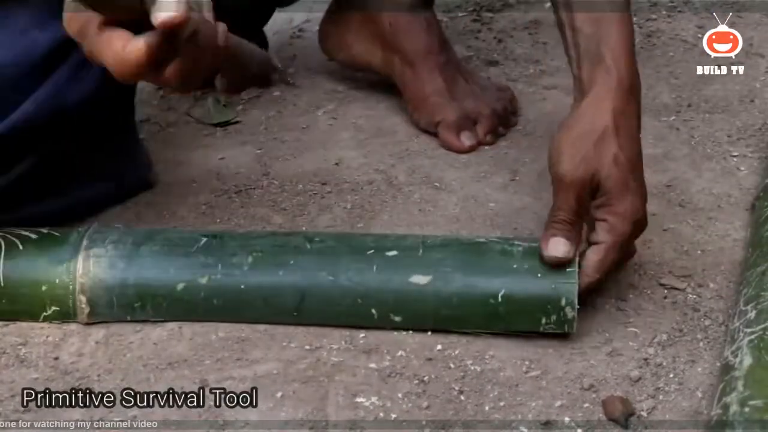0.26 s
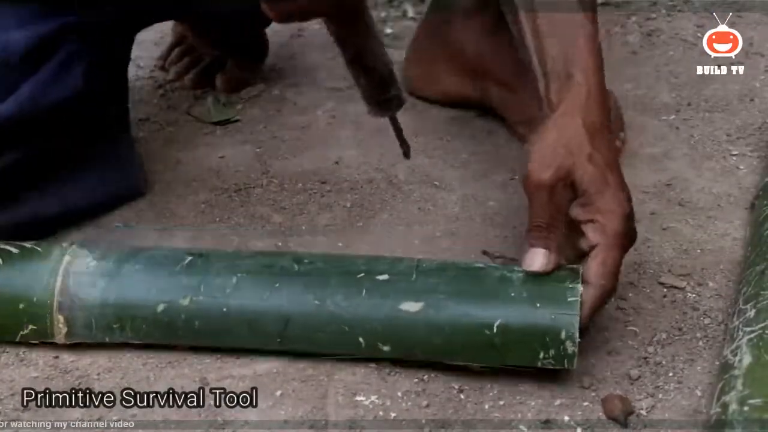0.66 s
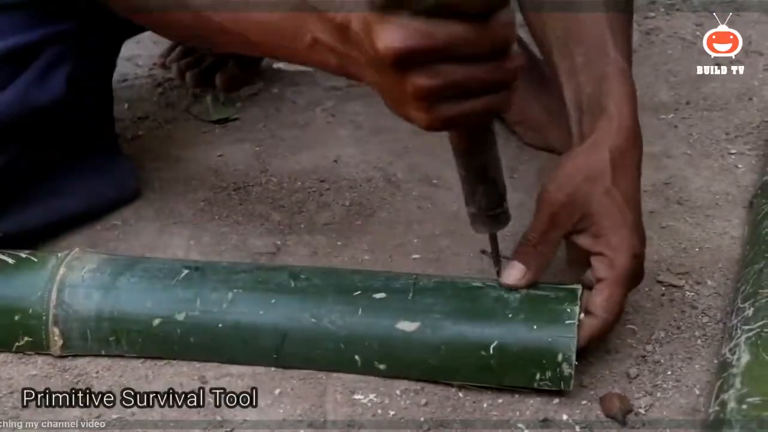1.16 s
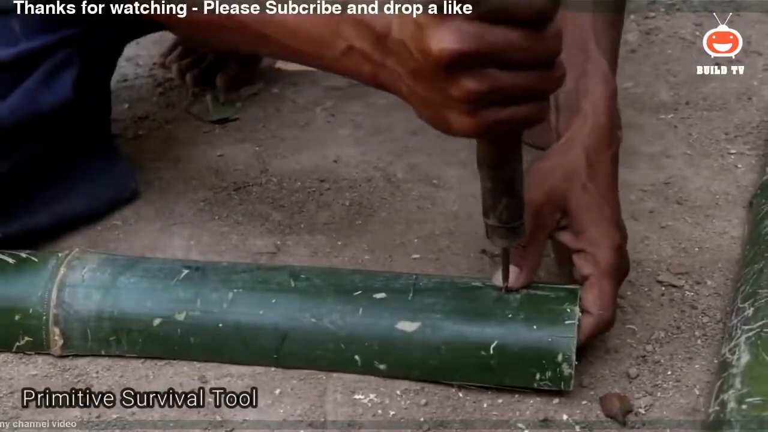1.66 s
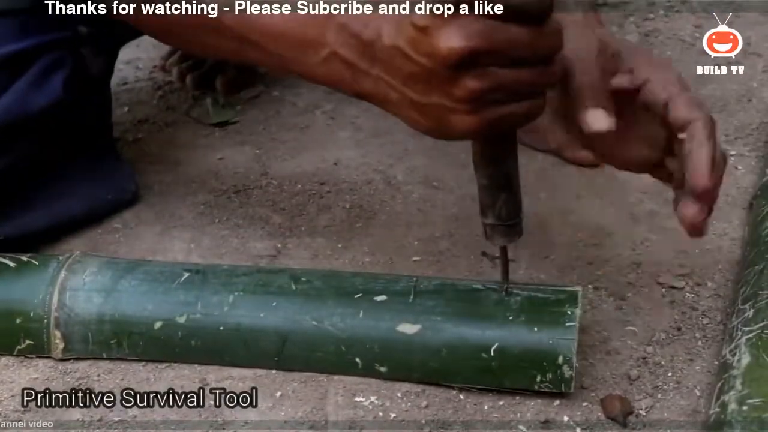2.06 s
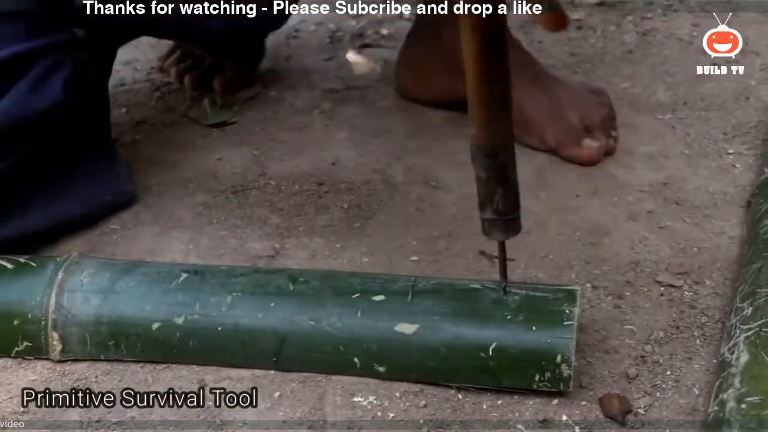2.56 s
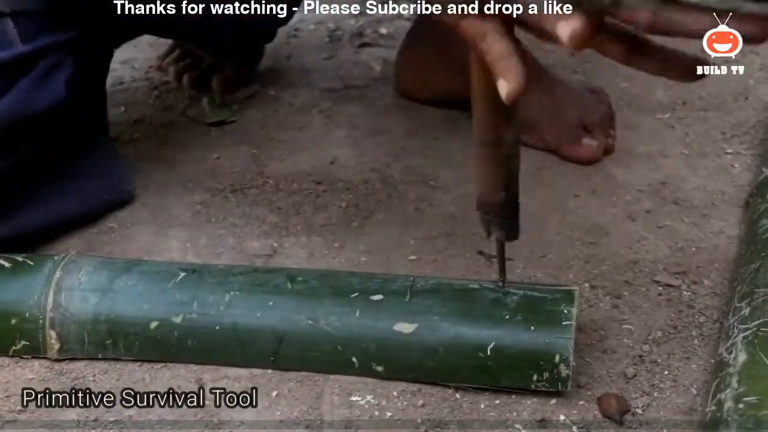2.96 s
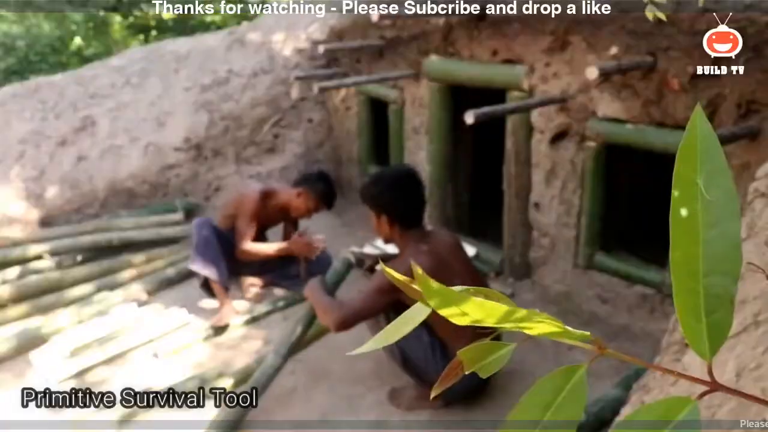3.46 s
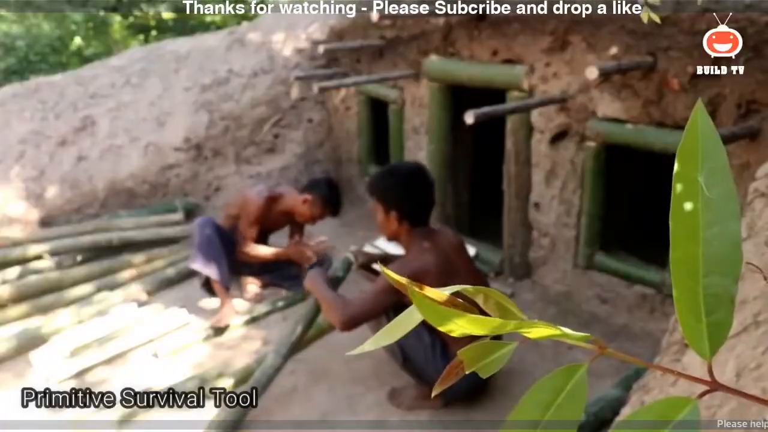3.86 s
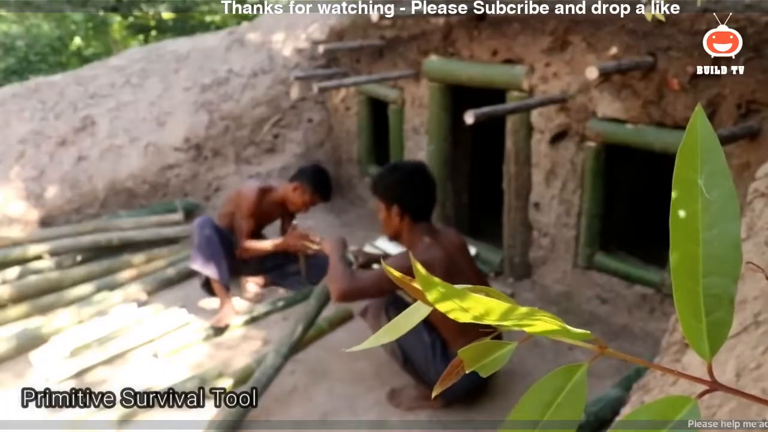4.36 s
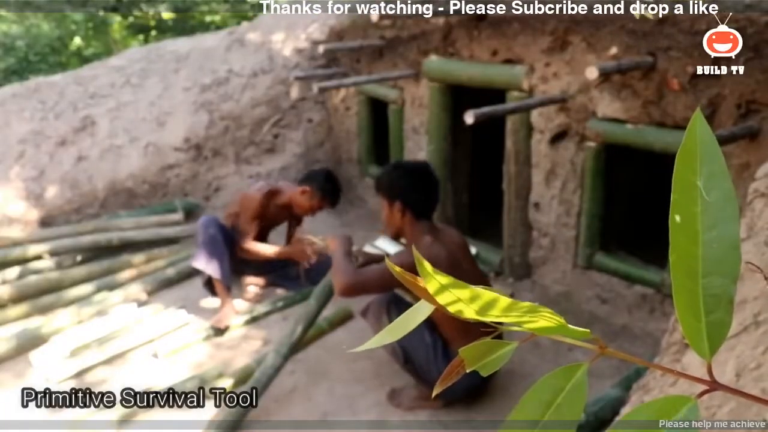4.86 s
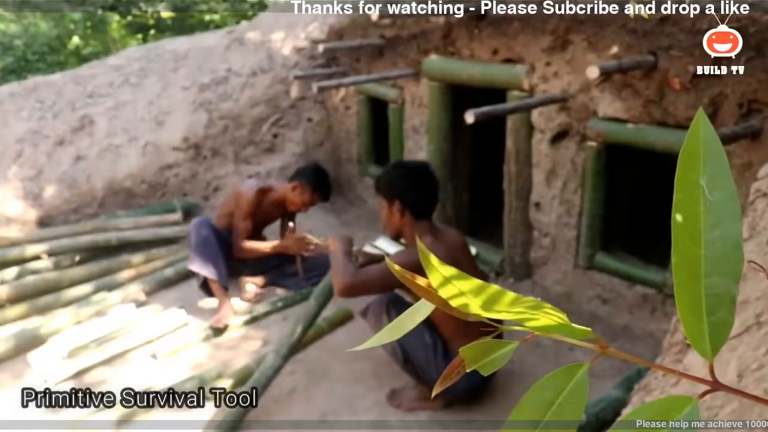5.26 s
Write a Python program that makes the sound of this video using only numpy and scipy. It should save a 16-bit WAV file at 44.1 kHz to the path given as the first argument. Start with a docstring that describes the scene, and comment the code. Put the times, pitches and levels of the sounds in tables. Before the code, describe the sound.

Outdoors, close to the microphone, a bamboo tube is shifted on packed earth: low bumps and rumble in the first half second, a small crunch at 0.05, a dull knock near 0.17 and gritty scrapes. A sharp double crack lands at 0.53, then a scrape at 0.7 and a hollow knock at 0.83. Hard blows on the chisel follow at about 1.08, 1.59 (softer), 2.16, 2.72 and 3.28 seconds, each a crunch of wet fibre with a brief hollow ring and low ground thump; some split into two quick cracks. A short squeak comes at 2.1, with a fainter one at 2.33. A knock and scrape precede the last blow at 3.2. From 3.4 the striking stops: faint knocks and shuffles, busiest around 4.5 to 4.9, sit over soft air, a high insect pulsing seven times a second and a low drone swelling towards the end.

```python
"""A palm drives a wooden-handled chisel into a green bamboo tube lying on packed earth, close to the microphone.
Each blow mixes crunching fibre noise, a ringing sum of the tube's tones and a low thump of the ground.
Between blows the handled tube knocks dully and scrapes on grit, the wedged blade squeaks and low rumbles swell;
later the handling is fainter. Shaped noise makes the outdoor air, a pulsing insect and a low drone.
A faint echo tail surrounds the work, and the recorder flattens the hardest peaks."""
import sys
import numpy as np
from scipy import signal
from scipy.fft import rfft, irfft
from scipy.io import wavfile
from scipy.ndimage import uniform_filter1d

SR = 44100
rng = np.random.default_rng(int(sys.argv[2]) if len(sys.argv) > 2 else 0)


def transcribe(signal):
    """Save signal, clipped to [-1, 1], as a 16-bit WAV file at the path in sys.argv[1]."""
    frames = np.atleast_2d(signal).T
    limited = np.clip(frames, -1, 1)
    pcm = np.round(limited * 32767).astype(np.int16)
    wavfile.write(sys.argv[1], SR, pcm)


N = 242550
CLOCK = np.arange(N) / SR  # time through the whole scene [s]
RING_SIZE = SR // 3  # samples in one short sound
RING_TIME = np.arange(RING_SIZE) / SR  # time within it [s]

# ringing tones of the bamboo tube: (pitch [Hz], relative level [dB], time to fall 60 dB [s])
TUBE_MODES = [(205, -11, .1), (302, -8, .09), (380, -14, .07), (505, -11, .07), (590, -14, .07),
              (885, -6, .07), (1000, -3, .07), (1083, -1, .065), (1290, -1, .075), (1556, 1, .075),
              (1680, -5, .06), (1892, 0, .075), (2287, -2, .08), (2560, -4, .07), (2911, -5, .07),
              (3177, -9, .06), (3364, -10, .06), (3496, -9, .06), (3821, -12, .06), (4080, -12, .04),
              (6320, -9, .05), (7512, -15, .05)]
# colour of scratching on grit: (frequency [Hz], relative level [dB])
GRIT_SPECTRUM = [(100, -23), (500, 1), (900, 5.5), (2000, -5.5), (3500, -2.5), (4800, -11.5), (7000, -7.5),
                 (11000, -14), (15500, -27)]
# likeness of left and right: (frequency [Hz], correlation [-1 to 1])
STEREO_LIKENESS = [(40, 1), (150, 1), (400, 0.87), (800, 0.89), (2000, 0.29), (6000, 0.094), (14000, 0.24)]


def undb(db):
    """Turn decibels into gain."""
    return 10 ** (np.asarray(db) / 20)


def on_log(points, hz):
    """Read (frequency [Hz], value) points on a log-frequency axis."""
    point_hz, value = np.transpose(points)
    return np.interp(np.log(hz + 1), np.log(point_hz), value)


def add(out, start_s, sound):
    """Mix a sound in at its start time."""
    first = max(int(start_s * SR), 0)
    out[:, first:first + sound.shape[1]] += sound[:, :max(N - first, 0)]


def noise(spectrum, size, treble_db=0, alike=1):
    """Shape stereo noise to a spectrum at rms 1, then raise or lower its treble."""
    hz = np.fft.rfftfreq(size, 1 / SR)
    gain = undb(on_log(spectrum, hz))
    gain = gain / np.sqrt(np.mean(gain ** 2))
    shelf = undb(treble_db * hz ** 2 / (hz ** 2 + 4000 ** 2))
    like = np.clip(alike * on_log(STEREO_LIKENESS, hz), -.98, .98)
    # the middle is shared by both sides; the side part has opposite signs
    shares = np.sqrt([(1 + like) / 2, (1 - like) / 2])
    mid, side = rfft(rng.standard_normal((2, size))) * shares
    return irfft(gain * shelf * np.array([mid + side, mid - side]), size)


def fade(t60, hold=0):
    """Hold full level, then fall exponentially by 60 dB in each t60 seconds."""
    return np.exp(-np.log(1000) * np.maximum(RING_TIME - hold, 0) / max(t60, .005))


def mode(hz, t60, cycle=0):
    """Ring one dying tone whose waves reach the two microphones with a difference of phase."""
    angle = np.arccos(np.clip(on_log(STEREO_LIKENESS, hz), -1, 1))
    spread = angle * rng.choice([-1, 1]) * np.array([[.5], [-.5]])
    return np.sin(2 * np.pi * (hz * RING_TIME + cycle) + spread) * fade(t60)


def swell(middle_s, spread_s):
    """Rise and fall smoothly in a bell shape around one moment."""
    return np.exp(-.5 * ((CLOCK - middle_s) / spread_s) ** 2)


def near(hz, centre_hz, octaves):
    """Tell how well a contact that favours one resonance drives a tone, from 0 to 1."""
    return np.exp(-.5 * (np.log2(hz / centre_hz) / octaves) ** 2)


def air():
    """Make a soft hush from broad noise, and a later low drone and pulsing insect from narrow noise."""
    # colour of the hush: (frequency [Hz], relative level [dB])
    hush_spectrum = [(15, -63), (25, -16.5), (80, -2.5), (117, -8.5), (157, -6.5), (229, -14), (263, -11),
                     (335, -10), (677, -16.5), (1190, -18.5), (1440, -19), (2000, -21.5), (3340, -26),
                     (8140, -27), (16000, -36)]
    # loudness of the hush: (time [s], level [dB])
    hush_level = [(0, -47), (1, -49), (3.3, -49), (4.2, -51.5), (5.5, -51.5)]
    hush = noise(hush_spectrum, N, alike=0.46)  # air comes from all around
    hush = hush * undb(np.interp(CLOCK, *np.transpose(hush_level)))
    later = np.clip((CLOCK - 3.42) / .05, 0, 1)
    chirp_hz = 7.17  # pulses per second
    chirps = np.clip(.4 + .7 * np.cos(2 * np.pi * chirp_hz * (CLOCK - 5.005)), 0, 1)
    insect = noise([(7200, -52), (7750, -12), (7930, 15), (8100, -10), (8700, -56)], N) * chirps
    drone = noise([(50, -66), (72, -15), (85, -3), (100, -24.0), (160, -85)], N) * swell(5.63, 0.53)
    return hush + undb(-64.5) * insect * later + undb(-50.5) * drone


def yard(sound, wet_db=-33, t60=1.67):
    """Scatter a faint tail from walls and trees by smearing the sound with dying noise."""
    # colour of the tail: (frequency [Hz], relative level [dB])
    tail_spectrum = [(80, 6), (300, -10), (700, -4), (1400, -18), (2800, 1.5), (4800, -8.5), (7500, 1),
                     (15000, -4)]
    time = np.arange(SR) / SR
    tail = noise(tail_spectrum, SR) * np.exp(-np.log(1000) * time / t60)
    tail = tail * np.minimum(time / 0.016, 1)  # the scattering builds up
    tail = tail / np.sqrt(np.sum(tail ** 2) / 2)
    return undb(wet_db) * signal.fftconvolve(sound, tail, axes=1)[:, :N]


def bumps():
    """Shape low noise into a rumble with brief swells of air and ground as the worker shifts."""
    # low bumps: (middle [s], level [dB], spread [s])
    bump_rows = [(0.089, -22.5, 0.02), (0.196, -21, 0.0089), (0.336, -24.5, 0.018), (.43, -29, 0.0086)]
    hz = 83  # strongest frequency
    rumble_spectrum = [(hz / 3, -14), (hz * 0.62, -6), (hz, 0), (hz * 1.43, -9),
                       (hz * 2.53, -13), (hz * 6, -38), (hz * 40, -80)]
    rumble = noise(rumble_spectrum, N, alike=0.29)
    # the steady rumble under the bumps dies away early
    shift_db, end_s, fade_s = -37.5, 0.77, 0.41
    shifting = undb(shift_db) * np.clip((end_s - CLOCK) / fade_s, 0, 1)
    power = shifting ** 2
    for middle_s, db, spread_s in bump_rows:
        power = power + (undb(db) * swell(middle_s, spread_s)) ** 2
    return rumble * np.sqrt(power)


def shuffles():
    """List faint scrapes at uneven moments, one in each short slot while the bamboo is handled."""
    # spells of handling: (start [s], end [s], middle level [dB], treble [dB])
    handling_spells = [(2.905, 3.2, -49, 12), (3.599, 4.05, -54, 1), (4.602, 4.919, -52.5, -5),
                       (5.28, 5.5, -53.5, -9)]
    gap_s, spread_s, scatter_db = .04, .011, 5
    rows = []
    for start_s, end_s, db, treble_db in handling_spells:
        slots = np.arange(start_s, end_s, gap_s)
        for slot_s, (late, size) in zip(slots, rng.uniform(-1, 1, (len(slots), 2))):
            middle_s = slot_s + gap_s * (1 + late) / 2
            rows.append((middle_s, db + scatter_db * size, spread_s, treble_db))
    return rows


def scrapes():
    """Let sand grains catch and slip in uneven noise, coloured by the ringing tube wall."""
    # scrapes of bamboo and feet on grit: (middle [s], level [dB], spread [s], treble [dB])
    scrape_rows = [(0.144, -35.5, 0.034, 6), (0.329, -41, .006, 7.5), (0.604, -38, 0.026, 0),
                   (0.717, -29, 0.016, 5.5), (0.791, -44.5, .053, 1), (1.716, -44.5, 0.0056, 10),
                   (2.105, -50.5, 0.038, 10.5), (2.371, -53.5, 0.12, 10.5), (2.827, -44, 0.014, 17),
                   (2.967, -49, 0.0037, -2), (3.087, -43.5, 0.0068, 4), (3.22, -33.5, 0.013, 0.5),
                   (3.943, -43, 0.0071, -1), (4.62, -41.5, .012, -6)]
    grain_scatter_db = 2.5  # uneven grain size, before smoothing
    out = np.zeros((2, N))
    # the tube's tones die twice as fast here
    wall = sum(undb(db) * mode(hz, t60 / 2, rng.random()) for hz, db, t60 in TUBE_MODES)
    wall = wall / np.sqrt(np.sum(wall ** 2) / 2)
    for middle_s, db, spread_s, treble_db in scrape_rows + shuffles():
        grain_db = grain_scatter_db * rng.standard_normal(RING_SIZE // 96 + 1)
        grains = uniform_filter1d(undb(grain_db).repeat(96)[:RING_SIZE], size=32)
        start_s = max(middle_s - RING_TIME[-1] / 2, 0)
        slip = grains * np.exp(-.5 * ((RING_TIME + start_s - middle_s) / spread_s) ** 2)
        scratch = noise(GRIT_SPECTRUM, RING_SIZE, treble_db) * slip
        push = slip * rng.standard_normal(RING_SIZE)
        body = signal.fftconvolve(wall, push[None], axes=1)[:, :RING_SIZE]
        add(out, start_s, undb(db) * (undb(-3.0) * scratch + undb(-7.0) * body))
    return out


def squeaks():
    """Stick and slip the blade in wet fibre, as brief pure tones of wavering pitch."""
    # squeaks of the wedged blade: (middle [s], level [dB], spread [s], middle pitch [Hz])
    squeak_rows = [(2.11, -34.5, 0.0052, 1335), (2.332, -44, 0.0041, 1100), (2.333, -47, 0.0043, 1960)]
    waver = uniform_filter1d(rng.standard_normal(N // 128 + 1).repeat(128)[:N], size=128)
    bent_time = np.cumsum(1 + 0.017 * waver) / SR  # time runs slightly fast and slow
    out = 0
    for middle_s, db, spread_s, hz in squeak_rows:
        out = out + undb(db) * swell(middle_s, spread_s) * np.sin(2 * np.pi * hz * bent_time)
    return out


def knocks():
    """Sound the hollow of the tube by soft contacts, with low tones, a short rattle and a little grit."""
    # dull knocks: (start [s], level [dB], favoured resonance [Hz], rise [s])
    knock_rows = [(.1668, -17, 760, 0.0023), (.18, -31, 680, 0.011), (.33, -29, 544, .004),
                  (.8252, -10.5, 574, 0.00094), (1.449, -42, 604, 0.0013), (2.97, -39, 900, 0.0023),
                  (3.012, -41, 750, .004), (3.131, -34.5, 695, 0.0076), (3.217, -21, 760, 0.0016),
                  (3.233, -32, 920, 0.009), (3.671, -45.5, 800, 0.0027), (3.695, -46, 596, 0.0016),
                  (3.83, -42.5, 620, .002), (3.862, -41.5, 950, 0.0098), (3.886, -44, 493, 0.0018),
                  (3.965, -38, 880, 0.0022), (3.992, -42.5, 595, 0.00099), (4.481, -47.5, 990, 0.01),
                  (4.556, -37.5, 890, 0.0083), (4.597, -39.5, 825, 0.0016), (4.655, -34.5, 850, 0.014),
                  (4.678, -35.5, 495, 0.0057), (4.755, -35, 860, 0.0014), (4.787, -43.5, 870, 0.0032),
                  (4.838, -34, 1120, 0.0072), (4.862, -44.5, 860, 0.013), (4.95, -49, 1010, 0.0033),
                  (5.338, -46, 940, 0.0016), (5.359, -43, 690, 0.016), (5.466, -42.5, 840, 0.015)]
    # low tones of the tube, damped by the hand: (middle pitch [Hz], relative level [dB])
    hollow_modes = [(255, 7.5), (340, 6.5), (598, 6), (775, -1.5), (1060, 0.5), (1440, -1.5)]
    # wall tones that only gritty contacts reach: (pitch [Hz], relative level [dB])
    wall_modes = [(1850, -37), (2430, -3.5), (3370, -12), (3720, -8)]
    # a knock of usual strength and pitch
    usual_db, usual_hz, usual_t60_s, usual_grit_db = -38.5, 805, 0.083, -13
    firm_db = 52  # a firmer grip halves the decay time for every so many dB
    # high contacts are grittier [dB per octave], heavy ones cleaner [dB per dB]
    grit_per_octave, grit_loss = 10.5, 0.42
    out = np.zeros((2, N))
    for start_s, db, favoured_hz, rise_s in knock_rows:
        extra_db = db - usual_db
        t60 = usual_t60_s * .5 ** (extra_db / firm_db)
        grit_db = usual_grit_db + grit_per_octave * np.log2(favoured_hz / usual_hz) - grit_loss * extra_db
        hollow = 0
        for hz, mode_db in hollow_modes:
            gain = undb(mode_db - 18.8 * (1 - near(hz, favoured_hz, octaves=0.57)))
            hollow = hollow + gain * mode(hz * (1 + 0.032 * rng.standard_normal()), t60)
        rattle_spectrum = [(120, -14), (350, -7), (favoured_hz, 0), (1250, -6), (2100, -25), (7000, -55)]
        rattle = noise(rattle_spectrum, RING_SIZE) * fade(t60)
        grit = undb(3.5) * noise(GRIT_SPECTRUM, RING_SIZE) * fade(t60)
        grit = grit + sum(undb(wall_db) * mode(hz, t60, rng.random()) for hz, wall_db in wall_modes)
        # a slow contact builds up before it dies away: undo the decay until the rise is over
        rise_s = max(rise_s, .0003)
        push = np.minimum(RING_TIME / rise_s, 1) / np.maximum(fade(t60), 1e-3 ** (rise_s / t60))
        mix = hollow + undb(-4) * rattle + undb(grit_db) * grit
        add(out, start_s, undb(db) * mix * push)
    return out


def chisel():
    """Snap fibres in quick succession as the blade sinks; the tube rings on and the ground thumps."""
    # blows and the splits that follow them:
    # (start [s], level [dB], bite time [s], crunch length [s], treble [dB], favoured resonance [Hz])
    blow_rows = [(0.0549, -21, 0.0021, 0.009, 12.5, 1010), (0.5307, -15, 0.0024, 0.0094, 7.5, 990),
                 (0.5417, -8.5, 0.00065, 0.0032, 1.5, 1560), (1.0788, -6.5, 0.0039, 0.0061, -1, 1880),
                 (1.5901, -14, 0.0024, 0.0051, -8.5, 1280), (2.1495, -17, 0.0017, 0.019, 6, 1540),
                 (2.171, -8, 0.00081, 0.0031, -0.5, 1560), (2.7158, -7, 0.0034, 0.0093, 3.5, 1020),
                 (2.7335, -13.5, 0.0038, .007, 1.5, 1080), (3.2783, -8.5, 0.0056, 0.0053, 9, 1900),
                 (3.292, -16.5, 0.003, 0.0094, 5.5, 1090)]
    # colour of breaking fibres: (frequency [Hz], relative level [dB])
    crunch_spectrum = [(60, -51), (200, -13), (500, -1.5), (700, -10.5), (1000, 0.5), (1900, 1.5),
                       (2800, -4), (3900, -7), (4800, -16.5), (6200, -11.5), (9000, -18), (15500, -29.5)]
    # colour of the struck earth: (frequency [Hz], relative level [dB])
    thump_spectrum = [(25, -22), (60, -3), (130, -0.5), (300, -3.5), (500, -22), (1200, -32), (4000, -90)]
    # a longer crunch feeds the ring more: level at the usual length, and dB per doubling of it
    usual_crunch_s, tube_db, tube_db_per_doubling = 0.006, -5.5, 8.5
    # the earth yields, so its thump grows more slowly: level under a 0 dB blow, and dB per dB
    thump_base_db, thump_growth = -24, 0.19
    out = np.zeros((2, N))
    split = signal.butter(2, 4200, fs=SR, output="sos")  # parts body from treble
    for start_s, db, bite_s, crunch_s, treble_db, favoured_hz in blow_rows:
        sizes = undb(0.75 * np.minimum(rng.exponential(size=RING_SIZE // 16 + 1), np.pi))
        snaps = uniform_filter1d(sizes.repeat(16)[:RING_SIZE], size=24)
        bite = np.minimum(RING_TIME / bite_s, 1)
        fibres = noise(crunch_spectrum, RING_SIZE, treble_db) * snaps / np.mean(snaps) * bite
        body = signal.sosfiltfilt(split, fibres)
        # the wet wall swallows the treble first; a faint scattered tail from ground and walls builds up and
        # outlasts the crack
        crunch = body * fade(0.061, crunch_s) + (fibres - body) * fade(0.04, crunch_s)
        rattle = noise(crunch_spectrum, RING_SIZE, treble_db + 4.0) * fade(0.21)
        rattle = rattle * np.minimum(RING_TIME / 0.032, 1)
        ring = 0
        for hz, mode_db, t60 in TUBE_MODES:
            favour_db = 3.8 * near(hz, favoured_hz, octaves=0.11)
            gain = undb(mode_db + favour_db + rng.standard_normal())
            ring = ring + gain * mode(hz * (1 + 0.0018 * rng.standard_normal()), t60, rng.random())
        ring = ring * (1 - np.exp(-RING_TIME / max(crunch_s / 2, .0005)))
        ring_db = tube_db + tube_db_per_doubling * np.log2(crunch_s / usual_crunch_s)
        thump = noise(thump_spectrum, RING_SIZE) * fade(0.2) * (1 - np.exp(-RING_TIME / 0.0015))
        thump_db = thump_base_db + thump_growth * db
        blow = undb(0.5) * crunch + undb(-20.5) * rattle + undb(ring_db) * ring
        add(out, start_s, undb(db) * blow + undb(thump_db) * thump)
    return out


def from_left(sound, lag_s):
    """Delay the right side, as sound from the left reaches that microphone a little later."""
    hz = np.fft.rfftfreq(N, 1 / SR)
    return irfft(rfft(sound) * np.exp(-2j * np.pi * hz * np.array([[0], [lag_s]])), N)


def scene():
    """Join the work, its yard tail, the rumble and the air, then balance left and right by frequency."""
    work = from_left(chisel(), lag_s=0.00018) + knocks() + scrapes() + squeaks()
    sound = work + yard(work) + bumps() + air()
    # left minus right: (frequency [Hz], level difference [dB])
    lean_points = [(500, 0), (2000, -1.6), (5000, -0.38), (9000, 0.93), (13000, 0.39)]
    lean_db = on_log(lean_points, np.fft.rfftfreq(N, 1 / SR))
    return irfft(rfft(sound) * undb(np.array([lean_db, -lean_db]) / 2), N)


def record(dry):
    """Overload smoothly near full level, flattening the hardest peaks, then cut the highest treble."""
    top_hz, ceiling = 15900, .95
    clipped = dry / (1 + (dry / ceiling) ** 8) ** (1 / 8)
    top_cut = signal.ellip(10, .2, 80, top_hz, fs=SR, output="sos")
    return signal.sosfilt(top_cut, clipped)


dry = scene()
out = record(dry)
transcribe(out)
```